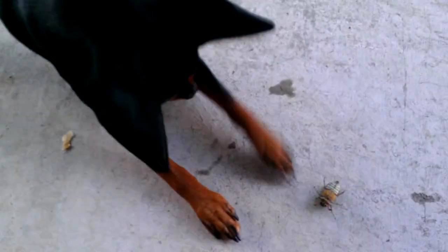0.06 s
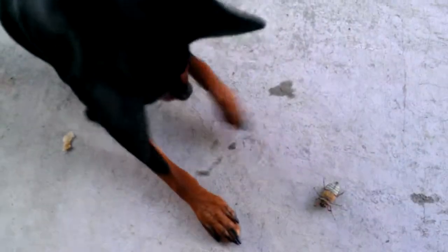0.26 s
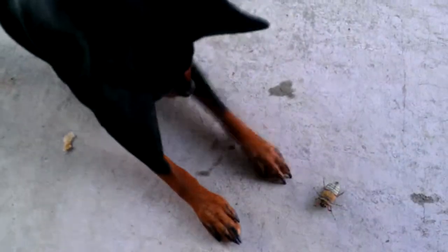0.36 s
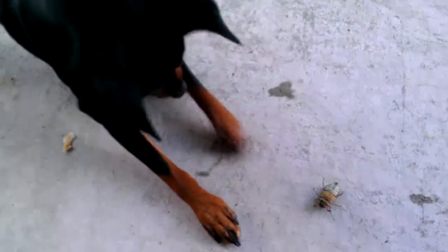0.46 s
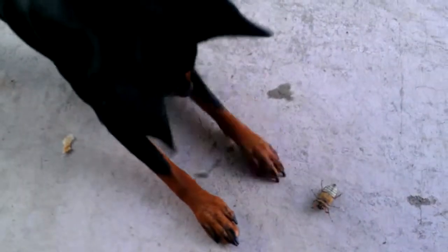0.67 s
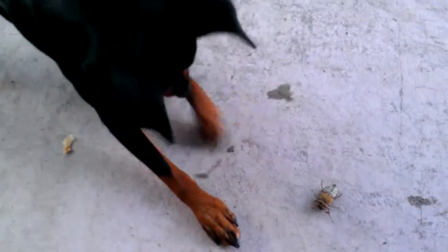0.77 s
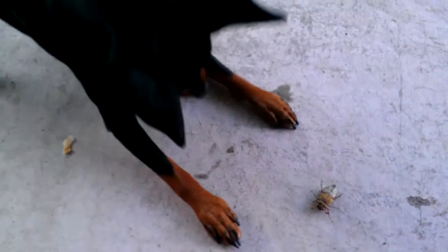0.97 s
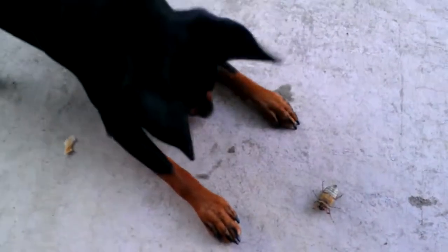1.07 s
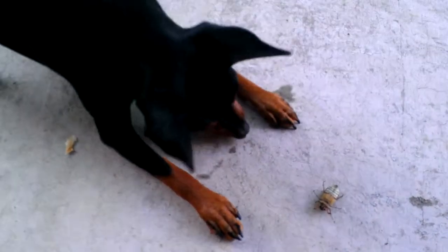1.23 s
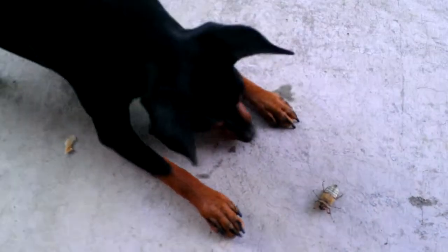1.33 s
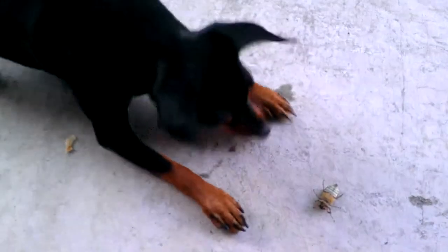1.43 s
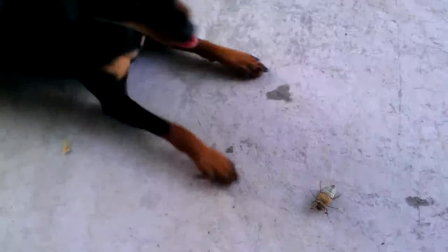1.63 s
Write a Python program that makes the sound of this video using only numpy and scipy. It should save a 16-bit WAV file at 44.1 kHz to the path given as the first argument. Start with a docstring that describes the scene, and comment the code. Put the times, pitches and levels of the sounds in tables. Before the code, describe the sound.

Close up on an outdoor patio, a dog scratches the concrete three times in quick succession, each stroke a bright, rattling rasp ending in a dull thud. Then come only light scuffs and a faint rumble.

```python
"""Dog pawing at a cicada.

Close up on a concrete patio: three quick, loud, buzzing rasps, most likely claws raking the grit.
Each is a dense rattle of tiny slips with a few sharp snaps, and ends in a soft thud of the paw.
Fainter scuffs follow over a low outdoor rumble. The dog is a little to the left of a stereo
microphone whose two ports each ring in the treble."""
import sys
import numpy as np
from scipy import signal
from scipy.fft import rfft, irfft
from scipy.io import wavfile
from scipy.ndimage import map_coordinates

SR = 44100
rng = np.random.default_rng(int(sys.argv[2]) if len(sys.argv) > 2 else 0)


def wrap_up_sound(samples):
    """Save the sound to the file named by the first command line argument, as 16-bit audio."""
    columns = np.atleast_2d(samples).T
    # keep every value between -1 and 1, then stretch to whole-number steps
    tamed = np.clip(columns, -1, 1)
    steps = np.round(tamed * 32767).astype(np.int16)
    wavfile.write(sys.argv[1], SR, steps)


N = 74970
T = np.arange(N) / SR
HZ = np.fft.rfftfreq(N, 1 / SR)
RIGHT_LATE_S = 0.000282  # the dog's sounds reach the left port first


def amp(db):
    """Decibels to gain."""
    return 10 ** (np.asarray(db) / 20)


def unit(x):
    """Scales to rms 1."""
    return x / np.sqrt(np.mean(x ** 2) + 1e-20)


def read(points, hz):
    """Reads a table on a log-frequency axis."""
    f, value = np.transpose(points)
    return np.interp(np.log(hz + 1), np.log(f + 1), value)


def shape(x, points):
    """Filters a sound by a table of f/Hz, gain/dB."""
    return irfft(rfft(x) * amp(read(points, HZ)), N)


def colour(x, points):
    """Filters by a table, then scales to rms 1."""
    return unit(shape(x, points))


def swells(rows):
    """Level curve of soft events: a rounded rise up to each time, then an exponential fall."""
    return sum(amp(db) * np.exp(-np.where(T < s, ((T - s) / rise) ** 2, (T - s) / fall))
               for s, rise, fall, db in rows)


def slips(per_s, spread_db):
    """A random train of tiny clicks; the wider the spread, the more a few stand out."""
    size = amp(spread_db * np.minimum(rng.exponential(1, N), 4.5))
    return size * rng.choice([-1, 1], N) * (rng.random(N) < per_s / SR)


def patchy(x, patch_db, patch_hz, patch_s):
    """The colour shifts at random from moment to moment, as the contact moves."""
    hz, t, spectra = signal.stft(x, SR, nperseg=512, noverlap=384)
    field = rng.standard_normal((128, 512))
    at = np.meshgrid(hz / patch_hz, t / patch_s, indexing="ij")
    spectra *= amp(patch_db * map_coordinates(field, at, order=1, mode="reflect"))
    return unit(signal.istft(spectra, SR, nperseg=512, noverlap=384)[1][:N])


def echo(x, decay):
    """Sparse reflections, different in each channel, dying away by a table of f/Hz, t60/s."""
    taps = rng.choice([-1., 1.], (2, SR)) * (rng.random((2, SR)) < 4000 / SR)
    taps[:, :30] = 0
    hz, t, spectra = signal.stft(taps, SR, nperseg=256)
    tail = signal.istft(spectra * amp(-60 * t / read(decay, hz)[:, None]), SR, nperseg=256)[1]
    tail /= np.linalg.norm(tail, axis=1, keepdims=True)
    return signal.fftconvolve(x[None], tail, axes=1)[:, :N]


def place(x, reflect_db, late_s=RIGHT_LATE_S, t60_s=0.022):
    """A spot on the slab: it reaches the right port later and has its own close reflections."""
    late = irfft(rfft(x) * np.exp(-2j * np.pi * HZ * late_s), N)
    return np.array([x, late]) + amp(reflect_db) * echo(x, [(1, t60_s)])


def port(x, ring_hz, lift_db, shelf_db, gain_db, width_hz=1250, shelf_hz=10700, size=2048):
    """One microphone port: a broad treble resonance and a shelf, at minimum phase."""
    hz = abs(np.fft.fftfreq(size, 1 / SR))
    ring = lift_db / (1 + (2 * (hz - ring_hz) / width_hz) ** 2)
    shelf = shelf_db * (1 + np.tanh((hz - shelf_hz) / 2000)) / 2
    log_gain = np.log(amp(gain_db + ring + shelf))
    response = np.fft.ifft(np.exp(np.conj(signal.hilbert(log_gain)))).real
    return signal.fftconvolve(x, response[:size // 2])[:N]


def air(hum_hz=66.5, rumble_top_hz=143):
    """Outdoor ambience: faint, wide hiss over a low rumble and hum that swell and sink."""
    # background spectrum: f/Hz, relative level/dB
    air_colour = [(20, -29), (45, -16), (68, -2.5), (160, -5), (300, -15.5), (700, -18.5), (1500, -26.5),
                  (3800, -29), (5500, -24.5), (8000, -23.5), (10500, -29.5), (16000, -28.5)]
    # likeness of left and right: f/Hz, correlation
    likeness = [(50, 1), (150, 0.95), (400, 0.79), (1000, 0.31), (4000, 0.033)]
    # swell of the rumble and hum: t/s, gain/dB
    rumble = [(0, 0), (.17, 2.5), (.43, 2), (.65, 3), (.74, 4.5), (.87, 11), (.91, -13), (.98, -10),
              (1.02, 7), (1.2, 2.5), (1.33, -1), (1.45, -5), (1.52, 0.5), (1.7, 9.5)]
    left, apart = rfft(rng.standard_normal((2, N)))
    same = read(likeness, HZ)
    right = same * left + np.sqrt(1 - same ** 2) * apart
    wash = amp(-58) * colour(irfft(np.array([left, right]), N), air_colour)
    drift, waver = (colour(z, [(6, 1), (20, -49), (80, -100)]) for z in rng.standard_normal((2, N)))
    phase = 2 * np.pi * np.cumsum(hum_hz + 1.31 * drift) / SR
    hum = amp(-66 + 2 * waver) * np.sqrt(2) * np.sin(phase)
    low = signal.sosfiltfilt(signal.butter(2, rumble_top_hz, fs=SR, output="sos"), wash)
    return wash - low + (low + hum) * amp(np.interp(T, *np.transpose(rumble)))


def thuds():
    """Dull pushes of the paws on the slab."""
    # weight of the paws: t/s, rise/s, fall/s, level/dB
    pushes = [(.015, .02, 0.034, -51.5), (.27, 0.034, .06, -50.5), (.56, 0.055, 0.15, -47.5),
              (.825, 0.043, 0.06, -44), (1.665, 0.01, .02, -44.5)]
    # thud spectrum: f/Hz, relative level/dB
    thud_colour = [(20, 13), (45, -5.5), (65, 2.5), (110, -0.5), (200, -6.5), (400, -30), (1500, -31)]
    return swells(pushes) * colour(rng.standard_normal(N), thud_colour)


def lean():
    """A soft, hissing scrape swells on the left as the dog leans in."""
    # the scrape: t/s, rise/s, fall/s, relative level/dB
    scrape = [(1.68, 0.049, 0.037, -49)]
    # its spectrum: f/Hz, relative level/dB
    scrape_colour = [(200, 4), (1000, -1.5), (2500, -2.5), (4200, 3), (4800, 7.5), (5500, 8), (6600, 1),
                     (7500, -1.5), (10000, -6.5), (16000, -6)]
    hiss = swells(scrape) * colour(rng.standard_normal(N), scrape_colour)
    return place(hiss, reflect_db=2.5) * amp([[-4], [-6.5]])


def paws():
    """Pads brush the ground as each stroke begins; light, gritty scuffs come before and after."""
    # pad brushes: t/s, rise/s, fall/s, relative level/dB
    brushes = [(.218, 0.0075, 0.0044, -52.5), (.499, 0.018, 0.0079, -51), (.777, 0.022, 0.0058, -50.5)]
    # pad spectrum: f/Hz, relative level/dB
    pad_colour = [(100, -5), (400, -8), (800, 1), (1500, 2), (2500, -3.5), (5000, -9), (12000, -54)]
    # light scuffs: t/s, rise/s, fall/s, relative level/dB
    scuffs = [(.01, 0.052, 0.028, -59.5), (.418, 0.0029, 0.015, -69), (.699, 0.0075, 0.009, -61.5),
              (1.36, 0.0089, 0.065, -64), (1.5, 0.033, 0.079, -66.5)]
    # scuff spectrum: f/Hz, relative level/dB
    scuff_colour = [(200, 18), (1000, -10), (2500, -19.5), (4200, -6.5), (6000, -9.5), (8000, 4),
                    (11000, -15.5), (16000, -18.5)]
    pads = swells(brushes) * colour(slips(per_s=3400, spread_db=0), pad_colour)
    return pads + amp(6.5) * swells(scuffs) * colour(slips(per_s=9100, spread_db=9.5), scuff_colour)


def narrow_bands(width_hz=130):
    """Brief narrow bands of noise during the rasps; the highest is a faint squeak."""
    # noise bands: t/s, half length/s, f/Hz, relative level/dB
    bands = [(0.241, 0.024, 2200, -53.5), (0.521, 0.0092, 920, -63), (0.811, 0.017, 865, -55.5)]
    out = np.zeros(N)
    for s, half, centre_hz, db in bands:
        passband = np.exp(-((HZ - centre_hz) / width_hz) ** 2)
        band = unit(irfft(rfft(rng.standard_normal(N)) * passband, N))
        out += amp(db) * np.exp(-((T - s) / half) ** 2) * band
    return out


def snaps():
    """Single bright cracks, each a claw snapping off a grain of sand."""
    # cracks: t/s, relative level/dB
    cracks = [(0.2176, -13), (0.2476, -10), (0.2619, -4), (.5171, -1), (0.5446, -12), (0.6982, -16),
              (0.796, -8), (.8029, -5), (0.804, 5), (.8282, -19), (.8321, 3.5), (.838, -2), (.8412, -22)]
    # crack spectrum: f/Hz, gain/dB
    crack_colour = [(300, -38), (2000, -57), (3200, -22), (5000, -6.5), (8000, -12.5), (11000, -4.5),
                    (15000, -3.5), (16500, 20)]
    clicks = np.zeros(N)
    for s, db in cracks:
        clicks[round(s * SR)] += amp(db)
    return amp(-3) * shape(clicks, crack_colour)


def rasps(attack_s=0.025, edge_db=-32, fizz_start_db=-14.5):
    """One claw rattles over grit: a coarse band, and a fizz that grows as the claw speeds up."""
    # strokes: start/s, end/s, relative level/dB, place of the peak (0-1),
    # start and end levels against the peak/dB, fizz gain at the end/dB, release/s
    strokes = [(0.218, 0.29, -24, 0.33, -6, -14, 4, 0.031), (0.486, 0.554, -24, 0.63, -4, -2.5, 3, 0.036),
               (0.765, 0.8455, -26, 0.12, -3.5, -4.5, 9, 0.02)]
    # spectrum of the coarse rattle: f/Hz, relative level/dB
    grit_colour = [(300, -89), (2000, -32.5), (2800, -22.5), (3600, -8.5), (5000, 0.5), (7800, 1.5),
                   (10000, -6), (16000, -6.5)]
    # spectrum of the fizz: f/Hz, relative level/dB
    fizz_colour = [(1000, -68), (3000, -22), (4000, -7), (7000, -16), (10000, -5), (13000, -11),
                   (15300, -5), (16500, 5.5)]
    grit = colour(slips(per_s=2000, spread_db=4.5), grit_colour)
    grit = patchy(grit, patch_db=4, patch_hz=355.8, patch_s=0.011)
    fizz = colour(slips(per_s=2200, spread_db=1.5), fizz_colour)
    fizz = patchy(fizz, patch_db=5, patch_hz=251.6, patch_s=0.015)
    out = np.zeros(N)
    for start, end, db, peak, start_db, end_db, fizz_db, release in strokes:
        press_db = np.interp(T, [start, start + (end - start) * peak, end], [start_db, 0, end_db])
        fade_db = edge_db * (np.maximum(start - T, 0) / attack_s + np.maximum(T - end, 0) / release)
        bright = amp(np.interp(T, [start, end], [fizz_start_db, fizz_db]))
        out += amp(db + press_db + fade_db) * (amp(-8) * grit + amp(-4) * bright * fizz)
    return out


def claws(count=2, spread_s=0.00002):
    """Each claw rasps on its own spot, close to the microphone."""
    delays = RIGHT_LATE_S + spread_s * np.linspace(-1, 1, count)
    return sum(place(rasps(), reflect_db=2.5, late_s=delay) for delay in delays) / np.sqrt(count)


def scene():
    """Close sounds, a little to the left, ring the microphone ports; the patio answers faintly."""
    # microphone ports, left then right: resonance/Hz, lift/dB, treble shelf/dB, gain/dB
    ports = [(5460, 9.5, 7.5, 2.5), (6490, 10, 1.5, 2.5)]
    # decay of the patio echo: f/Hz, t60/s
    patio_decay = [(200, 0.58), (2000, 0.26), (6000, 0.36), (15000, 0.65)]
    # colour of the patio echo: f/Hz, gain/dB
    patio_colour = [(200, 20), (3000, 11.5), (5500, 10), (8000, 5), (11000, 3.5), (16000, 0.5)]
    near = claws() + place(snaps(), reflect_db=-5.5)
    near += place(paws() + narrow_bands(), reflect_db=-6) + lean()
    direct = np.array([port(x, *row) for x, row in zip(near, ports)])
    patio = amp(-21) * echo(shape(near[0], patio_colour), patio_decay)
    return direct + patio + thuds() + air()


def record(dry, low_cut_hz=33.5, top_hz=15750):
    """The microphone's bass cut, then the band limit."""
    heard = signal.sosfilt(signal.butter(4, low_cut_hz, "high", fs=SR, output="sos"), dry)
    band_limit = signal.firwin(511, top_hz, window=("kaiser", 9), fs=SR)
    return signal.oaconvolve(heard, band_limit[None], "same")


dry = scene()
out = record(dry)
wrap_up_sound(out)
```